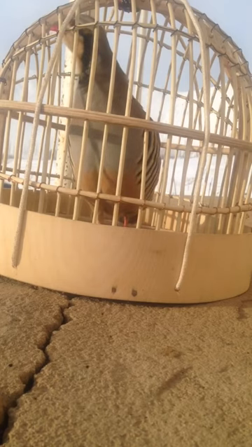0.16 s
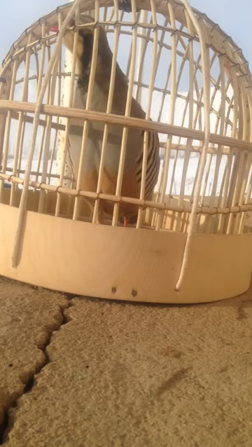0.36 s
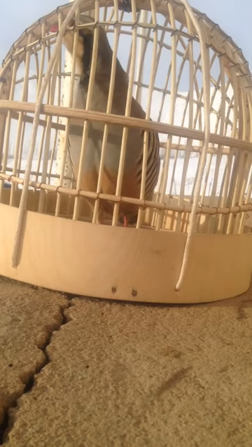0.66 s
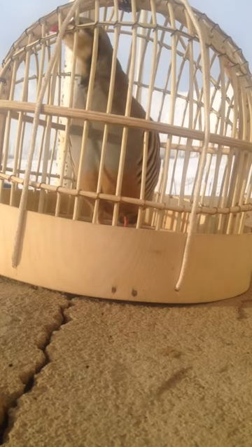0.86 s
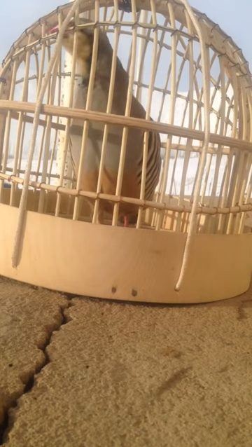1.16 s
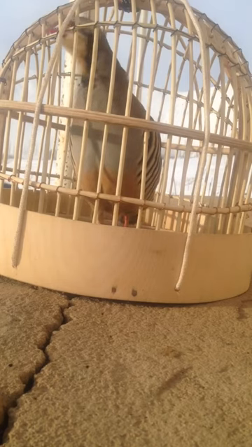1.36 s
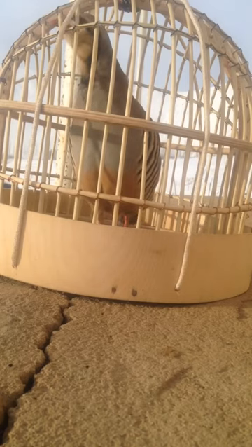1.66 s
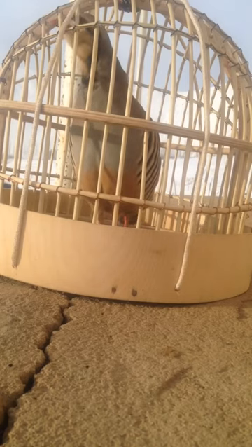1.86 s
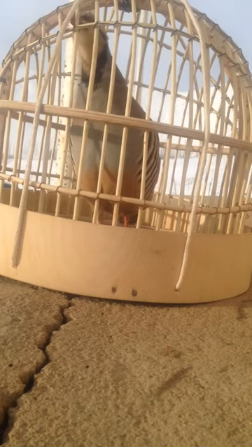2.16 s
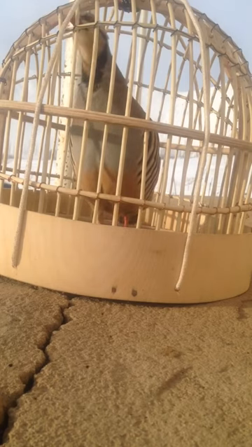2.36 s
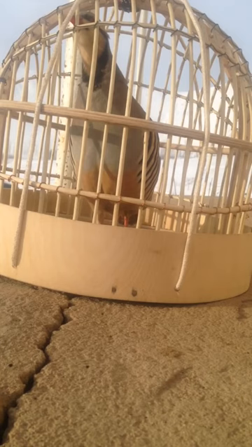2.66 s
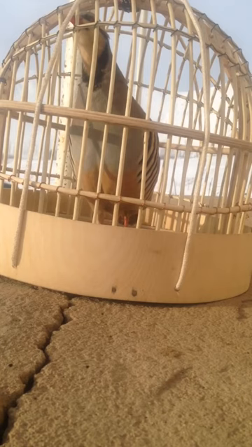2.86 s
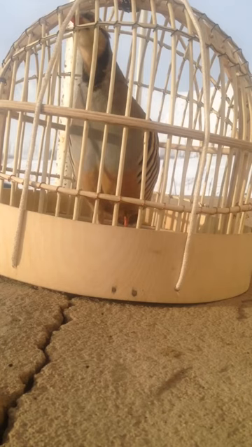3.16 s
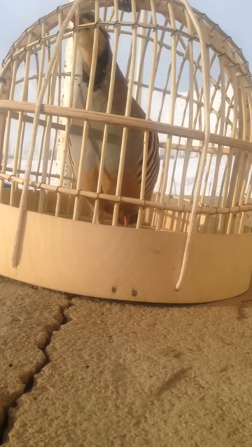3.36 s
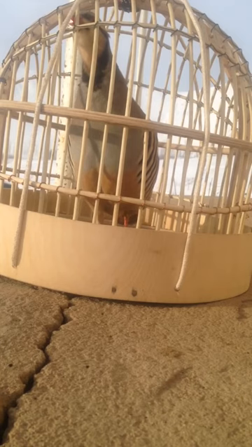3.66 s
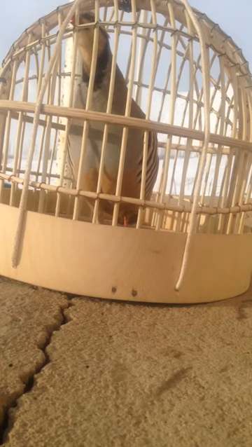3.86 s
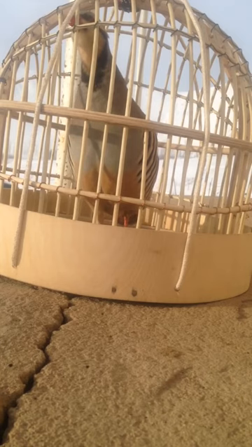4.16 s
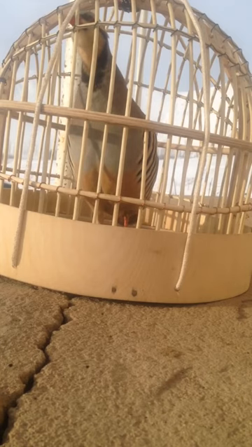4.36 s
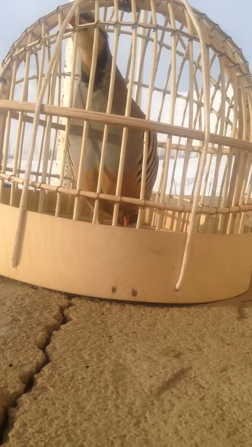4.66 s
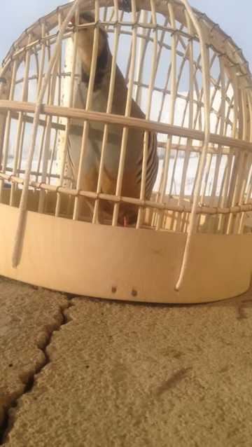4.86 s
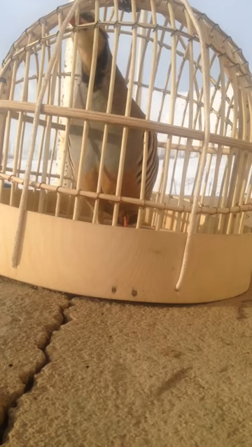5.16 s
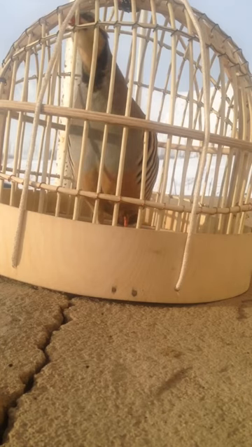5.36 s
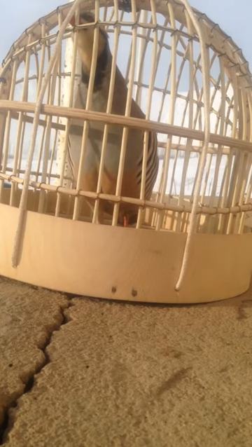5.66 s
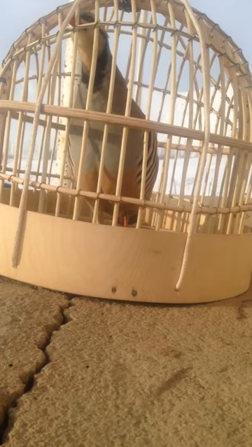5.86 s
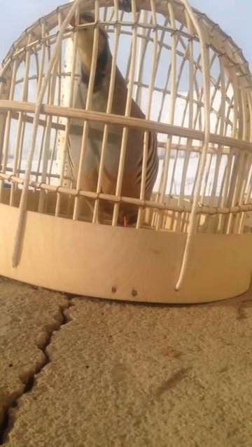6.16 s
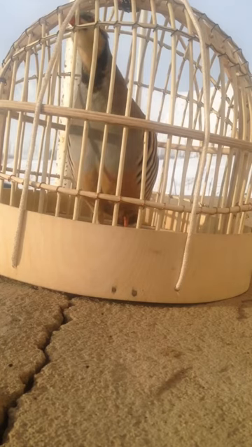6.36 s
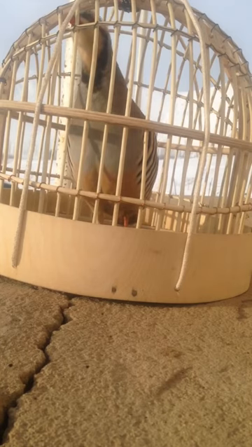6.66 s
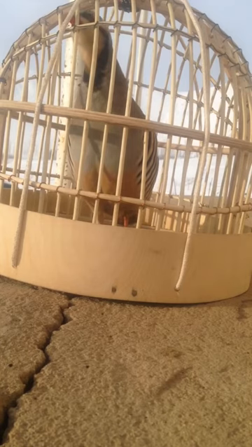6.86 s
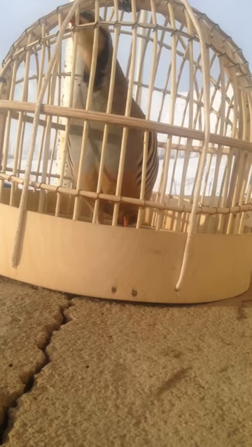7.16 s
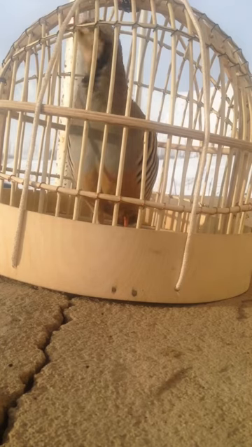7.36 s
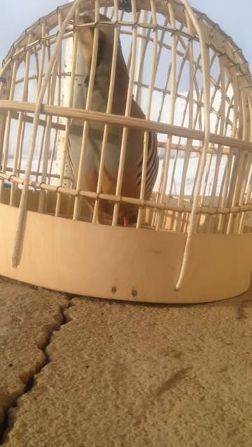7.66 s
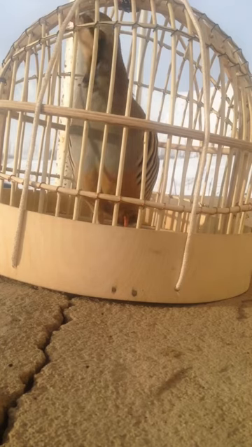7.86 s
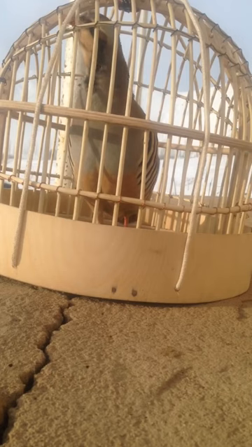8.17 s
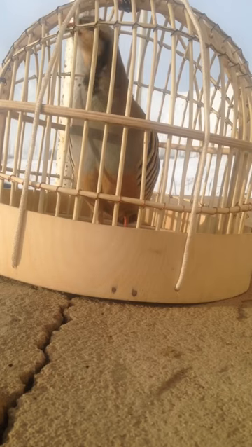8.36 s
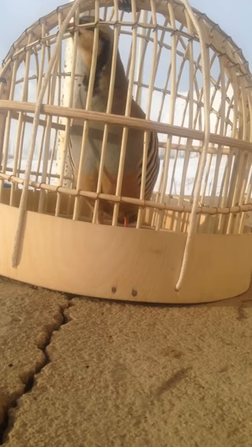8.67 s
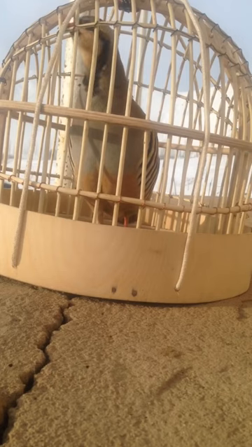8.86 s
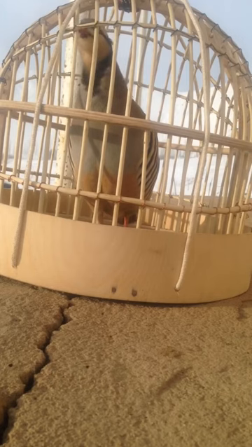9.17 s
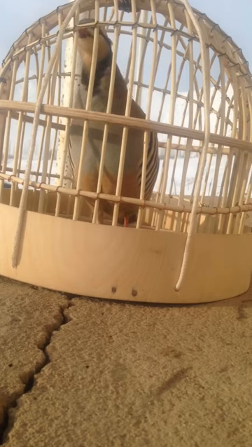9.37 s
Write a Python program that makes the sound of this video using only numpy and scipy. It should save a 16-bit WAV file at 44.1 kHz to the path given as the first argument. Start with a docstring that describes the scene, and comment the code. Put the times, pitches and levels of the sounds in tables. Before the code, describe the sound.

A partridge calls close by in a fast, even run of hoarse clucking phrases that grow stronger, then stop suddenly.

```python
"""A chukar partridge calls close by, from a wicker cage in a yard, about two phrases a second, then stops.
Each phrase is a hoarse chuck, a clear falling note and a rasp right behind it; the voice gains vigour,
holds and tires. Membrane pulses and breath in the syrinx ring the windpipe and open beak.
The yard echoes briefly; small birds whistle far off over a faint drone and hiss."""
import sys
import numpy as np
from scipy import signal
from scipy.fft import rfft, irfft, next_fast_len
from scipy.io import wavfile
from scipy.ndimage import map_coordinates

SR = 44100
rng = np.random.default_rng(int(sys.argv[2]) if len(sys.argv) > 2 else 0)


def to_wav(sig):
    """Store sig (one row per channel, or 1-D mono) as 16-bit WAV at the path in sys.argv[1].

    Samples outside -1..1 are clipped; the rate is SR.
    """
    pcm = np.clip(np.atleast_2d(sig), -1, 1) * 32767
    pcm = np.round(pcm).astype(np.int16)
    wavfile.write(sys.argv[1], SR, pcm.T)  # frames by channels


N = 419391
UPPER_HZ, TOP_HZ = 5000, 15500  # nominal upper throat resonance; band limit

# Phrases: chuck t/s, clear note t/s, rasp t/s, clear and rasp length/ratio, rasp glide delay/s, level/dB
PHRASES = [(.154, .341, 0.4025, 1.08, .016, 0), (0.609, 0.786, .843, 1.04, .014, 0.6),
           (1.048, 1.226, 1.294, 1.035, .01, 0.4), (1.494, 1.676, 1.742, 1.053, 0, -0.27),
           (1.953, 2.14, 2.217, .92, 0.00015, -0.1), (2.418, 2.601, 2.672, .89, 0, 0.44),
           (2.887, 3.072, 3.14, 0.93, 0, 1.17), (3.347, 3.53, 3.592, 0.99, 0.00024, .8),
           (3.815, 3.996, 4.065, 1.003, 0.00022, 0), (4.278, 4.464, 4.529, 0.98, 0, -0.35),
           (4.754, 4.942, 5.011, 0.97, 0.00071, 0.5), (5.23, 5.418, 5.487, 0.98, .003, 0),
           (5.704, 5.894, 5.96, .98, 0.00038, 0.5), (6.185, 6.378, 6.447, 1, 0, 0.1),
           (6.663, 6.853, 6.92, 1.01, 0.00053, 0.2), (7.136, 7.331, 7.397, 1, 0.0002, -0.3),
           (7.615, 7.798, 7.865, 1.05, 0.00031, 0.34), (8.085, 8.272, 8.347, 0.87, 0, -0.45)]
# Vigour of the bird: t/s, vigour/0-1
VIGOUR = [(.15, 0.33), (.6, 0.09), (1.8, 0.69), (2.6, .62), (3.5, 0.91), (5.6, 0.99), (7.38, 0.96),
          (7.61, 0.04), (7.85, .35), (8.3, 0.01)]


def partridge():
    """Chuck, clear note and rasp in each phrase; the two hoarse notes carry a squeak."""
    # Note shapes: t/s, effort/dB, pitch/ratio, roughness/0-1, throat tuning/ratio
    chuck_shape = [(0, -36, 1.56, .14, 1), (.005, -8.5, 1.33, .16, 1), (.011, -5.5, 1.15, .12, 1.06),
                   (.02, 0, 1.02, .2, .98), (.03, -3.5, .85, .45, .98), (.04, -9, .58, .5, .97),
                   (.051, -21.5, .38, .5, .92), (.064, -40, .27, .4, .88)]
    clear_shape = [(0, -30, 1.4, .25, .96), (.005, -7.5, 1.3, .3, .96), (.009, -7, 1.13, .22, .98),
                   (.014, -2.5, 1.02, .06, 1.01), (.021, 0, .995, .025, 1.02), (.032, -3.5, .95, .04, 1),
                   (.042, -11, .86, .16, .96), (.05, -20.5, .8, .25, .94), (.066, -26, .85, .3, .92)]
    rasp_shape = [(-.008, -21, 1.36, .13, .9), (.006, -9.5, 1.52, .06, .98), (.011, -4, 1.08, .1, 1.02),
                  (.022, -1.1, .98, .12, .99), (.032, -7, .68, .4, 0.98), (.041, -10.5, .54, .5, .93),
                  (.053, -25, .32, .5, .9), (.065, -39, .25, .4, 0.63)]
    chuck_s, clear_s, rasp_s, pair_stretch, rasp_delay_s, _ = np.transpose(PHRASES)
    chuck_stretch = 1.07 - .09 * np.interp(chuck_s, *np.transpose(VIGOUR))  # vigour shortens the chuck
    no_delay = np.zeros(len(PHRASES))
    chucks = note_plan(chuck_s, chuck_stretch, no_delay,
                       level_db=-27.5, swell_db=1.5, upper_db=4, base_hz=520.5, shift_hz=26.09)
    clears = note_plan(clear_s, 1.02 * pair_stretch, no_delay,
                       level_db=-28.5, swell_db=2.25, upper_db=3, base_hz=533, shift_hz=32.03)
    rasps = note_plan(rasp_s, pair_stretch, rasp_delay_s,
                      level_db=-28, swell_db=2.5, upper_db=3, base_hz=545.4, shift_hz=-4)
    bird = (notes(chucks, chuck_shape, upper_power=1.16, chest_db=-15, chip_db=-4, chip_ratio=1.06)
            + notes(clears, clear_shape, upper_power=1.04, chest_db=-8, chip_db=-2.5, chip_ratio=1)
            + notes(rasps, rasp_shape, upper_power=1.186, chest_db=-14.5, chip_db=-19, chip_ratio=.97)
            + squeaks(chucks, level_db=-2.5, onset_s=-.007)
            + squeaks(rasps, level_db=-3.5, onset_s=.0085))
    return filtered(bird, lambda hz: 1 - np.exp(-(hz / 300) ** 4))  # a small body radiates no bass


def note_plan(start_s, stretch, delay_s, level_db, swell_db, upper_db, base_hz, shift_hz):
    """One row a note: vigour adds level, brightness and breath, shifts pitch, lowers the upper band."""
    vigour = np.interp(start_s, *np.transpose(VIGOUR))
    note_db = level_db + swell_db * vigour + np.array(PHRASES)[:, -1]
    # shorter notes are brighter; the upper band fades slowly through the bout
    bright_db = upper_db + .5 * vigour + 13 * (1 - stretch) - .1 * start_s
    breath_db = -18.5 + 9.5 * vigour
    note_hz = (base_hz + shift_hz * vigour) * (1 + .015 * rng.standard_normal(len(start_s)))
    upper_hz = 5090 - 195 * vigour
    return np.transpose([start_s, note_db, bright_db, breath_db, note_hz, upper_hz, stretch, delay_s])


def notes(plan, shape, upper_power, chest_db, chip_db, chip_ratio, lead_s=.014, core_s=.045):
    """Syrinx through throat and chest: effort makes a note louder and brighter; quick ones are hoarser."""
    # Windpipe and beak resonances: f/Hz, half width/Hz, level/dB
    lower_resonances = [(610, 192, -22.5), (797, 71.7, -12), (1572.6, 133.4, 0.5), (2240, 173, -11.5),
                        (2722.4, 166, -7.5), (1780, 1536, -30)]
    upper_resonances = [(4010, 84, -23), (5033, 309, 1.5), (5705, 330, -15.5), (7750, 482, -20.5),
                        (10240, 568, -22.5), (11720, 360, -31.5), (13540, 962, -28), (8850, 930, -40.5)]
    t = np.arange(round(.11 * SR)) / SR - lead_s
    shape_s, *curves = np.transpose(shape)
    gate_s = [shape_s[0] - .002, shape_s[0], shape_s[-1], shape_s[-1] + .0022]
    levelled = lambda x: x / np.sqrt(np.sum(x ** 2) / (core_s * SR))
    track = np.zeros(N)
    for start_s, note_db, bright_db, breath_db, note_hz, upper_hz, stretch, delay_s in plan:
        effort_db, _, rough, tuning = [np.interp(t / stretch, shape_s, curve) for curve in curves]
        gate = np.interp(t / stretch, gate_s, [0, 1, 1, 0])
        effort = gate * amp(effort_db + wobble(130.7, len(t)))
        glide = np.interp((t - delay_s) / stretch, shape_s, curves[1])  # delay holds the high register
        swoop = 1 + .07043 * rng.standard_normal()
        pitch_hz = note_hz * glide ** swoop * (1 + (.006 + .05 * rough) * wobble(70, len(t)))
        source = cage(syrinx(pitch_hz, np.clip(rough / stretch ** 2, 0, .95), breath_db))
        lower = levelled(throat(source * effort, lower_resonances, tuning))
        upper_tuning = tuning ** .39 * upper_hz / UPPER_HZ
        upper = levelled(throat(source * effort ** upper_power, upper_resonances, upper_tuning))
        # the fundamental, and its octave when rough, also leave through the chest and linger
        phase = phase_of(pitch_hz)
        chest_tone = (1 - rough) * np.sin(phase) + 2.1 * rough * np.sin(2 * phase)
        chest = np.sqrt(effort) * chest_tone * np.clip(t / core_s, 0, 1)
        # the first rush of air briefly rings the upper resonance
        chip = np.sin(2 * np.pi * chip_ratio * upper_hz * t) * gaussian(t, .004, .0018)
        treble = amp(bright_db) * (upper + amp(chip_db) * chip)
        add(track, start_s - lead_s, amp(note_db) * (lower + treble + amp(chest_db) * chest))
    return track


def syrinx(pitch_hz, rough, breath_db, jitter=.076, spread_rad=1.275, harmonics=40):
    """Membrane pulses; roughness scatters their timing and size and turns them into puffs of noise."""
    size = len(pitch_hz)
    phase = phase_of(pitch_hz * (1 + (.0033 + jitter * rough) * wobble(502, size)))
    k = np.arange(1, harmonics + 1)[:, None]
    lag_rad = spread_rad * rng.standard_normal((harmonics, 1))  # a new pulse shape for each note
    pulses = unit(np.sum(np.cos(k * phase + lag_rad) * (k * pitch_hz < TOP_HZ), axis=0))
    puffs = unit(rng.standard_normal(size) * (1 + .49 * np.cos(phase)))
    turbulence = filtered(puffs, lambda hz: amp(breath_db) * (hz / UPPER_HZ) ** 2)
    flutter = np.exp(.25 * rough * wobble(400, size))
    return (np.sqrt(1 - rough) * pulses + np.sqrt(rough) * puffs + turbulence) * flutter


def throat(x, resonances, tuning):
    """Steep resonances that slide together as the throat changes length."""
    hz, t, spectrum = signal.stft(x, SR, nperseg=256, noverlap=192)
    scaled_hz = hz[:, None] / np.interp(t * SR, np.arange(len(x)), tuning)
    gain = sum(amp(db) * gaussian(scaled_hz, centre, width) for centre, width, db in resonances)
    return signal.istft(spectrum * gain, SR, nperseg=256, noverlap=192)[1][:len(x)]


def squeaks(plan, level_db, onset_s, throb_hz=190, throb_depth=.8, attack_s=.004):
    """The membrane's own tone falls and throbs through each hoarse note."""
    # Course of the tone within a note: t/s, f/Hz, level/dB
    course = [(-.007, 2450, -54.5), (-.002, 2046, -17.5), (.003, 1760, -4), (.009, 1680, -0.5),
              (0.021, 1576, -2), (0.037, 1510, 0), (.05, 1353, -7.5), (0.065, 1300, -45)]
    course_s, hz, db = np.transpose(course)
    t = np.arange(course_s[0], course_s[-1], 1 / SR)
    envelope = amp(level_db + np.interp(t, course_s, db)) * np.clip((t - onset_s) / attack_s, 0, 1)
    track = np.zeros(N)
    for start_s, note_db, *_ in plan:
        pitch_hz = np.interp(t, course_s, hz) * (1 + .025 * wobble(120, len(t)))
        throb = 1 + throb_depth * np.cos(phase_of(throb_hz * (1 + .21 * wobble(100, len(t)))))
        add(track, start_s + course_s[0], amp(note_db) * envelope * throb * np.sin(phase_of(pitch_hz)))
    return track


def cage(x, scatter_db=-9, t60_s=.011, build_s=.00042):
    """Bars and floor scatter each note for a few milliseconds."""
    t = np.arange(round(.02 * SR)) / SR
    echoes = rng.standard_normal(len(t)) * amp(-60 * t / t60_s) * (1 - np.exp(-t / build_s))
    return x + amp(scatter_db) * signal.fftconvolve(x, echoes / np.linalg.norm(echoes))[:len(x)]


def yard(x, wet_db=-6, build_s=.0042, far_db=-38, far_t60_s=.9, far_cutoff_hz=2500):
    """Wall and ground echoes, drawn anew for each call, with a weak long tail dulled by distance."""
    # Echo colour: f/Hz, level/dB
    colour = [(200, -13), (800, -15), (1150, 0.5), (1350, -4.5), (1650, -11), (2000, -14.5), (2800, -18),
              (4600, -18), (5500, -19.5), (10000, -7.5)]
    # Near echo decay: f/Hz, t60/s
    decay = [(300, .2), (1400, .19), (5000, .16), (12000, .11)]
    calls_s = [s for phrase in PHRASES for s in phrase[:2]]
    edges = [0] + [round((s - .02) * SR) for s in calls_s[1:]] + [N]
    track = np.zeros(N)
    for first, last in zip(edges, edges[1:]):
        hz, t, spectrum = signal.stft(rng.standard_normal(SR // 2), SR, nperseg=256)
        near = amp(-60 * t / along(decay, hz)[:, None])
        far = amp(far_db - 60 * t / far_t60_s) * np.exp(-(hz[:, None] / far_cutoff_hz) ** 2)
        tail = signal.istft(spectrum * (near + far) * (1 - np.exp(-t / build_s)), SR, nperseg=256)[1]
        tail = filtered(tail / np.linalg.norm(tail), lambda f: amp(along(colour, f)))
        add(track, first / SR, signal.fftconvolve(x[first:last], tail))
    return amp(wet_db) * track


def opening_echo(level_db=-43, t60_s=.18):
    """The echo of an earlier phrase dies away at the start."""
    # f/Hz, level/dB
    colour = [(300, -35), (900, -22), (1350, -3.5), (1700, -15), (2200, -26), (3500, -35),
              (4800, -20.5), (6500, -33), (12000, -55)]
    return noise(colour) * amp(level_db - 60 * np.arange(N) / SR / t60_s)


def far_birds():
    """Thin, slightly unsteady gliding whistles."""
    # Whistles: start t/s, end t/s, first f/Hz, last f/Hz, level/dB
    whistles = [(0.504, 0.631, 3290, 3332, -72), (0.651, .8, 6820, 7210, -63.5),
                (0.898, 1.279, 8187, 8015, -53.5), (1.099, 1.247, 3010, 3130, -59.5),
                (1.26, 1.751, 8020, 7580, -64), (1.407, 1.716, 5620, 5540, -58),
                (1.507, 1.681, 11150, 11200, -67.5), (1.695, 1.964, 5550, 5420, -63.5),
                (1.8, 1.96, 2783, 2810, -68), (2.95, 3.095, 3253, 3144, -68), (3.18, 3.36, 3220, 3074, -65)]
    track = np.zeros(N)
    for start_s, end_s, first_hz, last_hz, db in whistles:
        size = round((end_s - start_s) * SR)
        pitch_hz = np.linspace(first_hz, last_hz, size) * (1 + .003 * wobble(120, size))
        swell = signal.windows.tukey(size, .8) * amp(db + 3.5 * wobble(30, size))
        add(track, start_s, swell * np.sin(phase_of(pitch_hz)))
    return track


def far_drone(pitch_hz=208):
    """A distant wavering tone and its octave."""
    # Swell: t/s, level/dB
    swell = [(0, -86), (1, -86), (1.6, -74), (2.6, -88.5), (4, -92), (9.5, -99)]
    phase = phase_of(pitch_hz * (1 + .067 * wobble(1.5, N) + .15 * wobble(45, N)))
    level_db = np.interp(np.arange(N) / SR, *np.transpose(swell)) + 3.4 * wobble(10, N)
    return (np.sin(phase) + np.sin(2 * phase)) * amp(level_db)


def air(hiss_db=-67, puff_db=-68, puff_s=3.69, puff_width_s=.06):
    """Steady hiss and one soft low puff of air."""
    # Noise spectra: f/Hz, relative level/dB
    hiss_colour = [(15, -63.5), (25, -24), (71, 0.5), (88, -2.5), (103, -12), (135, -5), (167, -9),
                   (450, -10), (1420, -12.5), (6720, -10), (12800, -11), (15000, -10.5)]
    puff_colour = [(25, -13.5), (70, -3.5), (160, 3), (400, -20.5), (1500, -80)]
    puff = noise(puff_colour) * gaussian(np.arange(N) / SR, puff_s, puff_width_s)
    return amp(hiss_db) * noise(hiss_colour) + amp(puff_db) * puff


def amp(db):
    """Decibels to gain."""
    return 10 ** (np.asarray(db) / 20)


def unit(x):
    """Scale to rms 1."""
    return x / np.sqrt(np.mean(x ** 2) + 1e-20)


def gaussian(x, centre, width):
    """Bell curve of peak 1."""
    return np.exp(-.5 * ((x - centre) / width) ** 2)


def phase_of(hz):
    """Running phase in radians."""
    return 2 * np.pi * np.cumsum(hz) / SR


def along(points, hz):
    """Read (f/Hz, value) points on a log axis."""
    knots_hz, values = np.transpose(points)
    return np.interp(np.log(hz + 1), np.log(knots_hz + 1), values)


def wobble(rate_hz, size):
    """Smooth random curve, rate_hz knots a second."""
    knots = rng.standard_normal(int(size * rate_hz / SR) + 4)
    return map_coordinates(knots, [np.arange(size) * rate_hz / SR])


def filtered(x, response):
    """Apply a gain given as a function of frequency."""
    size = next_fast_len(len(x) + 8192)
    return irfft(rfft(x, size) * response(np.fft.rfftfreq(size, 1 / SR)), size)[:len(x)]


def noise(colour):
    """Coloured noise of rms 1."""
    return unit(filtered(rng.standard_normal(N), lambda hz: amp(along(colour, hz))))


def add(track, start_s, x):
    """Mix x into the track at start_s."""
    start = max(round(start_s * SR), 0)
    track[start:start + len(x)] += x[:N - start]


def scene():
    """The partridge, its echo and the quiet yard, in mono."""
    bird = partridge()
    return (bird + yard(bird) + opening_echo() + far_birds() + far_drone() + air())[None]


def record(dry):
    """Brick-wall low-pass at the band limit."""
    return filtered(dry[0], lambda hz: hz < TOP_HZ)[None]


dry = scene()
out = record(dry)
to_wav(out)
```